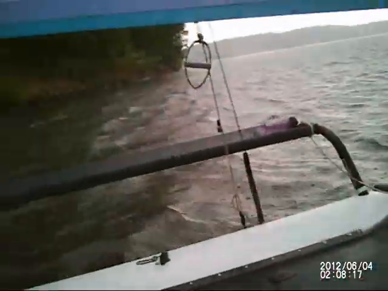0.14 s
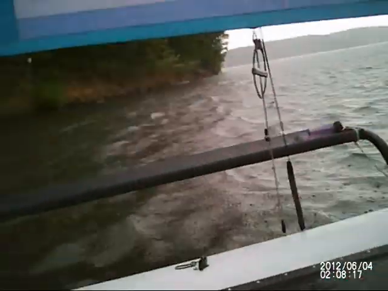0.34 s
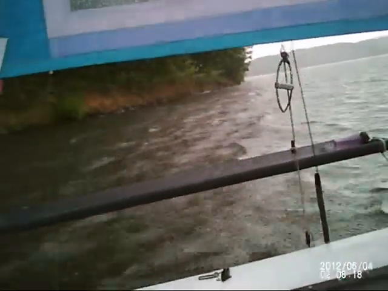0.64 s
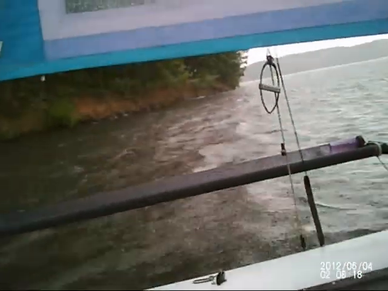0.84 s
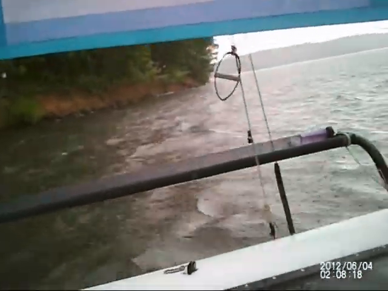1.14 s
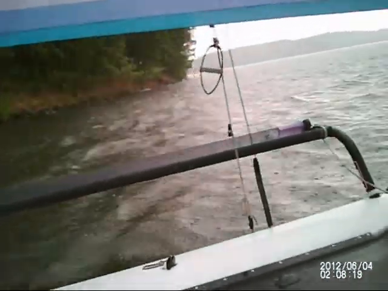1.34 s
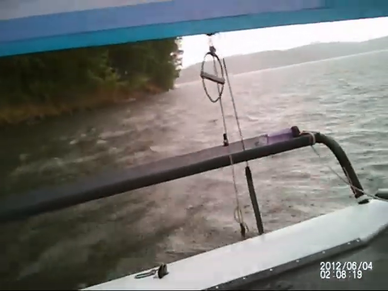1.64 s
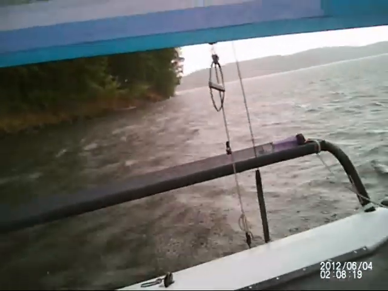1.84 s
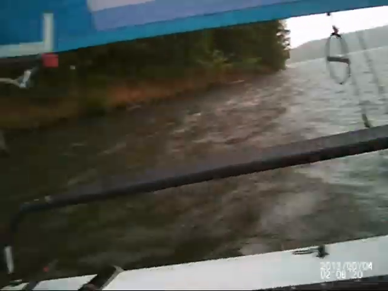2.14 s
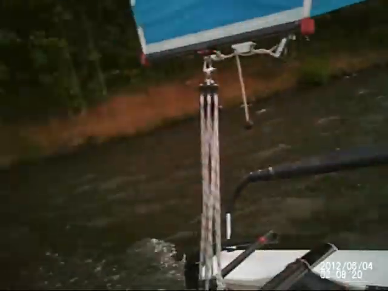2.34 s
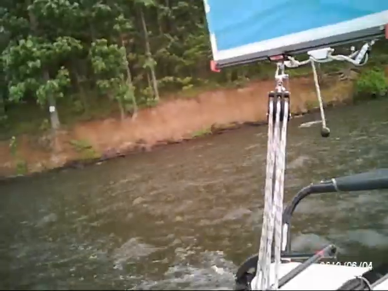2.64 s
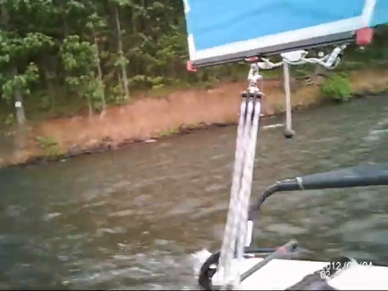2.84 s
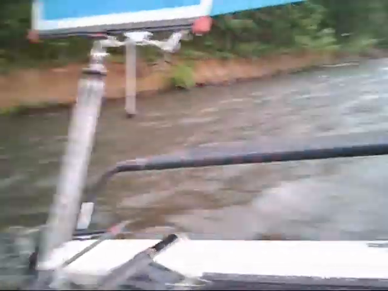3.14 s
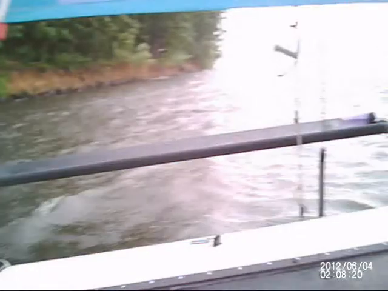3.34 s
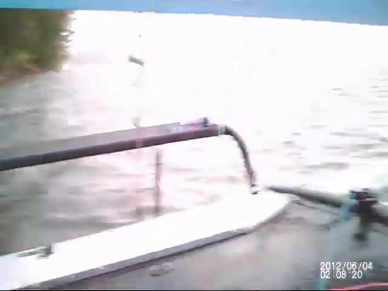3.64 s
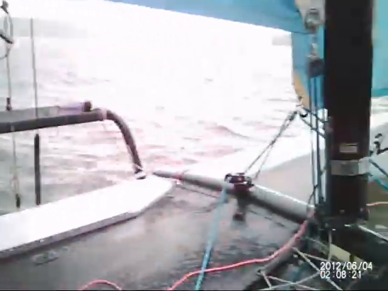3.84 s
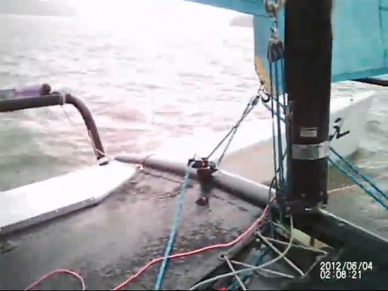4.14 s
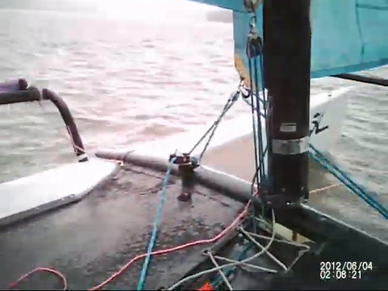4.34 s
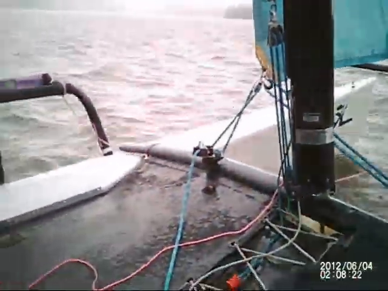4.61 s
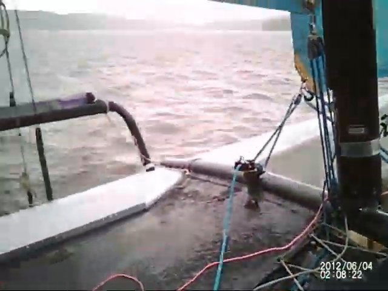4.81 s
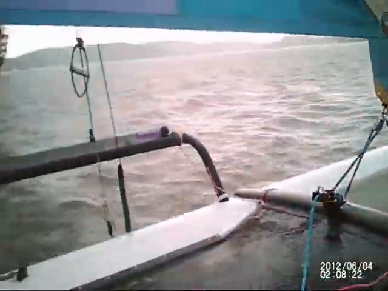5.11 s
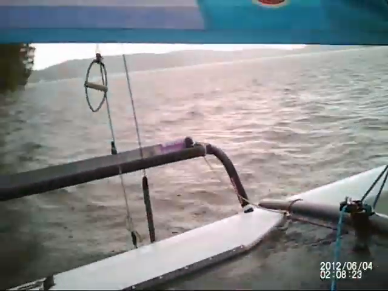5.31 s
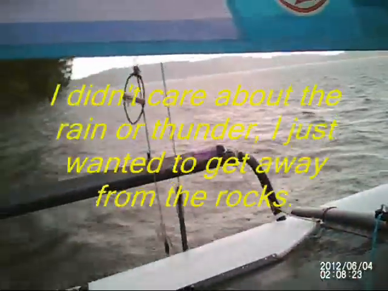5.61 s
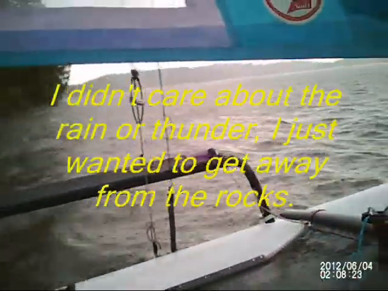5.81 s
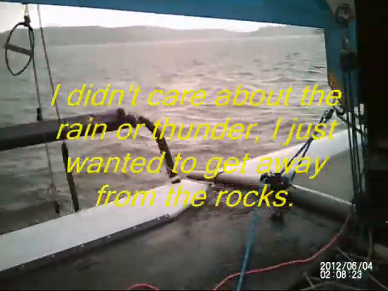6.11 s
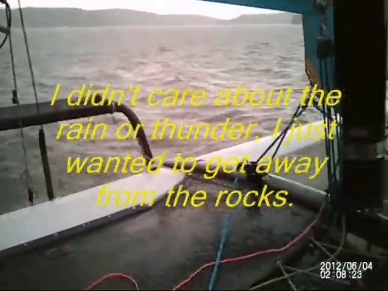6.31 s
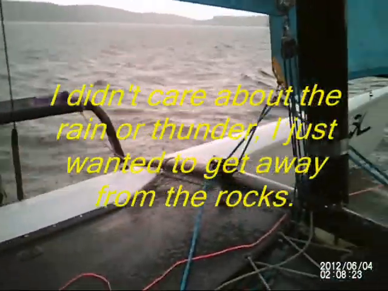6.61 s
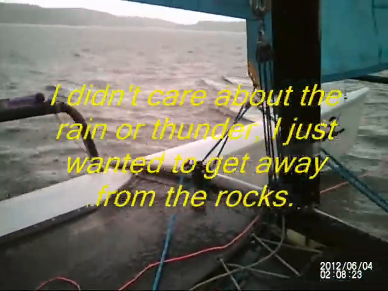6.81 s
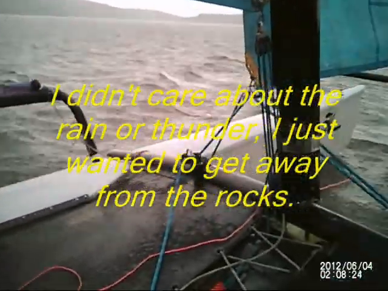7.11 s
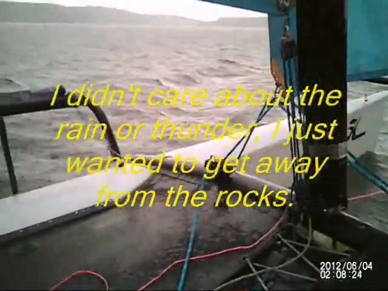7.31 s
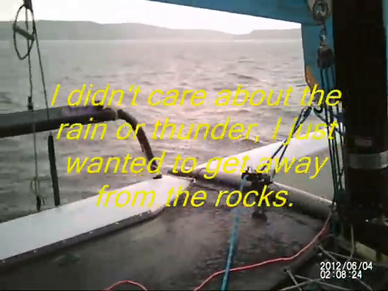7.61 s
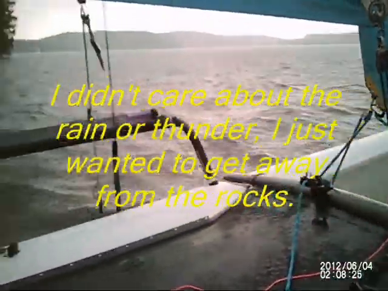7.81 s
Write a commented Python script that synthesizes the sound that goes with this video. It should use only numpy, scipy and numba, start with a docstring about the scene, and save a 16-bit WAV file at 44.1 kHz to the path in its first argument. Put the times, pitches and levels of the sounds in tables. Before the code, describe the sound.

Steady rain hisses over choppy lake water and a small boat, with sharp drop ticks, wave slaps and thumping low wind gusts, gritty and close.

```python
"""On the deck of a small sailing boat on a choppy lake, a cheap camera hears steady rain.
Filtered noise and many small impulses make the rain; near drops tick on the camera's case as short rings.
Waves are swells of noise with ringing bubbles and spray; gusts are low noise with thumping eddies.
The camera turns down loud moments, clips, and holds each sample at a low rate.
Those steps mirror the sound into a gritty treble."""
import sys
import numpy as np
from scipy import signal
from scipy.fft import rfft, irfft
from scipy.io import wavfile
from scipy.ndimage import uniform_filter1d
from numba import njit

SR = 44100
rng = np.random.default_rng(int(sys.argv[2]) if len(sys.argv) > 2 else 0)


def unload_audio(sound):
    """Save the sound as a 16-bit wav file, at the path given as the first command line argument."""
    columns = np.transpose(np.atleast_2d(sound))
    # keep every value between -1 and 1, then stretch to whole-number steps
    steps = np.round(np.clip(columns, -1, 1) * 32767)
    wavfile.write(sys.argv[1], SR, steps.astype(np.int16))


N = 351036
TIME = np.arange(N) / SR  # seconds

# Rain that eases slowly: time_s, level_db
RAIN_LEVEL = [(0, -22), (.55, -22.5), (1.6, -22), (2.1, -22.5), (2.8, -22.5), (4.0, -25), (4.7, -24.5),
              (5.95, -27), (7.96, -25.5)]
# Steady wash of water along the hulls: time_s, level_db
CHOP_LEVEL = [(0, -25.5), (1.7, -33.5), (3.6, -25.5), (4.3, -29.5), (5.6, -29.5), (6.2, -32.5), (7.96, -33)]
# Waves that slap the hulls: peak_s, churn_level_db, spray_level_db, half_width_s
WAVES = [(.12, -32, -25, .05), (.76, -18, -21, 0.045), (1.01, -15, -18, 0.03), (1.24, -20.5, -19, 0.082),
         (1.72, -21.5, -22.5, 0.058), (2.23, -20.5, -26, 0.097), (2.49, -17, -19, 0.049),
         (3.015, -14, -26, 0.039), (3.13, -25, -18, 0.019), (3.3, -18.5, -22.5, 0.042),
         (3.95, -30.5, -25.5, 0.097), (5.18, -37, -25.5, 0.052), (5.41, -25, -24.5, 0.09),
         (6.2, -36, -24, 0.051), (6.43, -34, -26, .05), (6.62, -23.5, -22, 0.074), (7.33, -25, -31, 0.15),
         (7.65, -39, -23, 0.057)]
# Gusts on the microphone, each with an eddy at its height: peak_s, level_db, half_width_s, eddy_pitch_hz
GUSTS = [(.19, -25, 0.089, 171), (.34, -27, .04, 200), (.705, -20.5, 0.12, 198), (0.929, -24, 0.048, 200),
         (1.143, -21, .03, 264), (1.225, -12, 0.05, 340), (1.444, -12.5, 0.04, 306),
         (1.607, -17, 0.12, 262), (1.715, -17, 0.066, 253), (1.785, -15, 0.03, 230),
         (1.969, -11.5, 0.031, 302), (2.055, -3.5, 0.023, 245), (2.241, -15.5, 0.041, 294),
         (3.01, -32, 0.018, 343), (3.198, -23.5, 0.036, 160), (3.55, -16.5, 0.0097, 245),
         (3.631, -16.5, 0.052, 213), (3.743, -17, 0.02, 304), (3.919, -19, 0.039, 164),
         (3.964, -18, 0.083, 268), (4.165, -20.5, 0.014, 219), (4.488, -18, 0.043, 295),
         (4.696, -16, 0.069, 188), (4.883, -22, 0.11, 316), (5.631, -15.5, 0.072, 235),
         (5.748, -19, 0.01, 286), (6.171, -19, 0.045, 245), (6.535, -19, 0.069, 276),
         (7.081, -17.5, 0.038, 166), (7.38, -34, .07, 200), (7.544, -17, 0.083, 216)]
# Tone colours, relative levels only: frequency_hz, gain_db
RAIN_COLOUR = [(60, -46), (150, -6), (400, -9), (800, -4.5), (1200, 0), (1550, 3), (2000, -1.5),
               (2400, -10), (2900, -16), (3400, -12.5), (3750, -21.5), (4000, -33)]
CHOP_COLOUR = [(50, -49), (130, -14), (350, 1), (600, 1), (950, -0.5), (1400, -4), (2500, -38.5)]
WIND_COLOUR = [(20, -51), (45, -53), (75, -14.5), (115, -1), (160, 1), (270, -2), (400, -8), (700, -21),
               (2000, -37.5)]
# Drops that strike the case: peak_s, tick_level_db, tick_pitch_hz, thud_level_db (before THUD_LIFT_DB)
CASE_DROPS = [(0.2796, -7, 1490, -23), (.359, 0, 1390, -20), (1.0556, -1.5, 1600, -14),
              (1.0826, -6, 1610, -23), (1.2006, -1, 1420, -23), (1.259, 0, 1710, -9),
              (1.301, -3.5, 1850, -20), (1.3324, 2, 1400, -33), (1.4576, -2.5, 1590, -13),
              (1.898, 1, 1870, -13), (2.432, -4, 1700, -21), (2.4605, -5, 1940, -32), (2.55, -2, 1890, -32),
              (2.654, -3, 1560, -13.5), (2.7204, 1, 1650, -15.5), (2.7774, -5.5, 1340, -24),
              (2.8559, -3, 1680, -16), (2.8617, 0, 1410, -18), (2.9728, -2.5, 1780, -27),
              (3.1007, 3, 1720, -25), (3.1724, 2, 1480, -16), (3.2105, 3, 1620, -11),
              (3.6432, 0, 2000, -30), (4.661, 1.5, 1410, -30), (4.8819, 5.5, 1450, -11),
              (5.0763, -4.5, 1650, -21), (5.2209, -6.5, 1620, -36), (5.3211, -6.5, 1590, -19),
              (5.447, -5, 1810, -26), (5.664, -4.5, 1360, -19), (5.917, -5, 1590, -15.5),
              (6.3482, -8.5, 1700, -36), (6.7348, -5.5, 1400, -40), (6.8211, -4, 1560, -21),
              (7.306, -13, 1330, -27), (7.4304, -4.5, 1570, -21), (7.618, -7, 1570, -35),
              (7.65, -6, 1580, -27)]
# Moments when the level dips briefly: middle_s, depth_db, width_s (standard deviation of the bell shape)
DIPS = [(1.503, -8.5, 0.0075), (2.806, -7, 0.022), (3.579, -11, 0.0055), (3.68, -5, 0.0087),
        (6.94, -1, 0.028), (7.57, -6, 0.017)]
# Air pockets closing in the waves: start_s, peak_level_db, starting_pitch_hz, rise_s
PLOPS = [(2.861, -10, 614, 0.0031), (2.935, -17, 338, 0.0054), (3.003, -14, 303, 0.0085),
         (3.125, -16, 564, 0.0076), (3.36, -14, 1015, 0.0032), (4.334, -14.5, 1017, 0.0068),
         (5.467, -9.5, 780, 0.0026), (5.48, -10.5, 1020, 0.0025)]

WAVE_FALL, GUST_FALL = 1.45, 0.97  # fall time as a multiple of rise time
BREEZE_DB = -29  # wind between the gusts
EDDY_DB = 12  # an eddy's peak above its gust's level, before the leak filter
CRACK_DB, THUD_LIFT_DB = -10.5, 4.0  # crack relative to its tick; lift added to every thud
DUCK_ABOVE_DB, DUCK_RATIO = -8.5, 1.74  # the camera's gain control
DUCK_ATTACK_S, DUCK_RELEASE_S = 0.0019, 0.04
CAMERA_HZ = 8000  # the camera's sample rate
TOP_HZ = 15550  # upper limit of the finished sound


def undb(db):
    """Turn decibels into a gain."""
    return 10 ** (np.asarray(db) / 20)


def curve(rows):
    """Join rows of (time_s, value) by straight lines."""
    return np.interp(TIME, *np.transpose(rows))


def swells(rows, steady_db, fall):
    """Level in dB of a steady bed plus swells that grow and die away exponentially."""
    power = undb(steady_db) ** 2
    for peak_s, level_db, half_width_s in rows:
        # a swell halves its amplitude for each half width away from its peak; the fall is scaled
        away = np.maximum(peak_s - TIME, (TIME - peak_s) / fall) / half_width_s
        power = power + (undb(level_db) * np.exp2(-away)) ** 2
    return 10 * np.log10(power)


def colour(x, points):
    """Shape the tone through (frequency_hz, gain_db) points, without looking ahead; rms 1."""
    hz, db = np.transpose(points)
    size = 4096
    grid_hz = np.fft.rfftfreq(size, 1 / SR)
    gain_db = np.interp(np.log(grid_hz + 1), np.log(hz), db)
    # folding the cepstrum gives a filter that responds as early as it can
    cepstrum = irfft(np.log(undb(gain_db)))[:size // 2]
    cepstrum[1:] *= 2
    response = irfft(np.exp(rfft(cepstrum, size)))
    y = signal.fftconvolve(x, response)[:N]
    return y / np.std(y)


def walk(rate):
    """Random levels held for 1 / rate seconds, then smoothed twice; spread 1."""
    hold = int(SR / rate)
    held = rng.standard_normal(N)[np.arange(N) // hold]
    smooth = uniform_filter1d(uniform_filter1d(held, hold), hold)
    return smooth / np.std(smooth)


def ring(hz, rise_s, glide=0):
    """A damped swing whose outline peaks at 1 after rise_s; its pitch climbs by glide per rise time."""
    age = np.arange(int(10 * rise_s * SR)) / (rise_s * SR)  # in rise times
    cycles = hz * rise_s * age * (1 + glide * age / 2)
    return age * np.exp(1 - age) * np.sin(2 * np.pi * cycles)


def add(out, at_s, sound):
    """Mix a sound in from a given time."""
    i = max(int(at_s * SR), 0)
    out[i:i + len(sound)] += sound[:max(N - i, 0)]


def impacts(per_s, spread_db, largest_db):
    """Impulses at random moments, many small and few large; rms 1."""
    hit = rng.random(N) < per_s / SR
    # tanh keeps the sizes below largest_db
    size_db = largest_db * np.tanh(spread_db * rng.exponential(size=N) / largest_db)
    x = hit * undb(size_db) * np.sign(rng.standard_normal(N))
    return x / np.std(x)


@njit
def follow(size, attack, release):
    """Level follower that rises quickly and sinks slowly."""
    out, level = np.empty(len(size)), 0.
    for i in range(len(size)):
        level += (size[i] - level) * (attack if size[i] > level else release)
        out[i] = level
    return out


def rain():
    """Far drops on the lake merge into a hiss; nearer ones patter on deck and sail in flurries."""
    hiss = undb(-2.0) * rng.standard_normal(N)
    patter = undb(-7.5) * impacts(per_s=520, spread_db=3.5, largest_db=19)
    flurry_db = 1.2 * walk(rate=48)
    # a few land within arm's reach and stand out as single ticks
    near = undb(-8.5) * impacts(per_s=26, spread_db=13, largest_db=14.5)
    wash = colour(hiss + patter + near, RAIN_COLOUR) * undb(flurry_db)
    # drops on puddles and taut cloth ring for a cycle or two, some low, some high
    pats = np.zeros(N)
    for hz in np.geomspace(1000, 2100, 6):
        hits = impacts(per_s=24, spread_db=12.5, largest_db=16.5)
        pats += signal.fftconvolve(hits, ring(hz, rise_s=1.23 / hz))[:N]
    # spray thrown up by the waves falls with the rain
    spray = [(s, spray_db, width) for s, _, spray_db, width in WAVES]
    level_db = swells(spray, curve(RAIN_LEVEL), WAVE_FALL)
    return (wash + undb(-6) * pats / np.std(pats)) * undb(level_db)


def chop():
    """Churning water swells with each wave; small bubbles rise in pitch as they reach the surface."""
    churn = colour(rng.standard_normal(N), CHOP_COLOUR) * undb(3.3 * walk(rate=35) - 2.5)
    bubbles = np.zeros(N)
    for when, size, depth in rng.random((800, 3)):
        hz = 380 * 3.26 ** size
        bubble = undb(-16 * depth) * ring(hz, rise_s=1.94 / hz, glide=0.026)
        add(bubbles, when * N / SR, bubble)
    slaps = [(s, churn_db, width) for s, churn_db, _, width in WAVES]
    level_db = swells(slaps, curve(CHOP_LEVEL), WAVE_FALL)
    return (churn + undb(4) * bubbles) * undb(level_db)


def wind():
    """Turbulence rumbles on the microphone, brighter when it blows hard; eddies thump at each gust's height."""
    gust_db = swells([row[:3] for row in GUSTS], BREEZE_DB, GUST_FALL) + 1.14 * walk(rate=40)
    rumble = colour(rng.standard_normal(N), WIND_COLOUR) * undb(gust_db - 2.5)
    flutter_colour = [(120, -24.5), (420, 1.5), (650, -6), (1200, -8.5), (2500, -28.5)]  # Hz, dB
    # the flutter's level changes more than the rumble's as the wind rises and falls
    flutter = colour(rng.standard_normal(N), flutter_colour) * undb(1.26 * gust_db - 5.5)
    thumps = np.zeros(N)
    for peak_s, level_db, _, hz in GUSTS:
        rise_s = 0.5 / hz
        add(thumps, peak_s - rise_s, undb(level_db + EDDY_DB) * ring(hz, rise_s, glide=-0.031))
    # smaller eddies tumble by at random, as strong as the wind of the moment
    tumble = np.zeros(N)
    for hz in (170, 240, 340):
        hits = impacts(per_s=14, spread_db=1, largest_db=8)
        tumble += signal.fftconvolve(hits, ring(hz, rise_s=0.5 / hz))[:N]
    thumps += tumble / np.std(tumble) * undb(gust_db - 7.5)
    # the slowest pressure changes leak round the diaphragm
    leak_hz = 80
    leak = signal.butter(2, leak_hz, "high", fs=SR, output="sos")
    return rumble + flutter + signal.sosfilt(leak, thumps)


def case_drops():
    """A drop on the case: a crack, a short tick, a duller thud of the shell, and a little scattered spray."""
    out = np.zeros(N)
    tick_s, spray_s, crack_s = 0.00034, 0.004, 0.0002  # rise, fade and rise times
    age = np.arange(SR // 40) / SR
    noises = rng.standard_normal((len(CASE_DROPS), len(age)))
    for (peak_s, tick_db, hz, thud_db), noise in zip(CASE_DROPS, noises):
        add(out, peak_s - crack_s, undb(tick_db + CRACK_DB) * ring(3340, crack_s))
        add(out, peak_s - tick_s, undb(tick_db) * ring(hz, tick_s))
        thud_hz = 500 * np.exp(0.3 * noise[0])  # differs from drop to drop
        add(out, peak_s, undb(thud_db + THUD_LIFT_DB) * ring(thud_hz, rise_s=0.0017))
        spray = signal.fftconvolve(noise * np.exp(-age / spray_s), ring(0.98 * hz, tick_s))
        add(out, peak_s, undb(tick_db - 9.0) * spray / np.max(np.abs(spray)))
    return out


def brief_dips():
    """Gain that sags for an instant now and then, each dip a smooth bell shape in dB."""
    dip_db = np.zeros(N)
    for middle_s, depth_db, width_s in DIPS:
        dip_db += depth_db * np.exp(-((TIME - middle_s) / width_s) ** 2 / 2)
    return undb(dip_db)


def plops():
    """Large air pockets ring, rising slightly in pitch, as waves fold against the hulls."""
    out = np.zeros(N)
    for start_s, level_db, hz, rise_s in PLOPS:
        add(out, start_s, undb(level_db) * ring(hz, rise_s, glide=0.013))
    return out


def scene():
    """Weather and water together; the dips touch rain, chop and wind but not the plops or case drops."""
    background = rain() + chop() + wind()
    mix = background * brief_dips() + case_drops() + plops()
    return mix[None]  # one channel


def duck(x):
    """Gain control: a loud sound turns everything down for an instant."""
    level = follow(np.abs(x), 1 / (DUCK_ATTACK_S * SR), 1 / (DUCK_RELEASE_S * SR))
    excess = np.maximum(level / undb(DUCK_ABOVE_DB), 1)
    return x * excess ** (1 / DUCK_RATIO - 1)


def record(dry):
    """The camera ducks, samples slowly, clips and holds steps, which mirror the sound above 4 kHz."""
    slow = signal.resample_poly(duck(dry[0]), CAMERA_HZ, SR)
    clipped = np.clip(slow, -0.93, 0.93)
    soften = signal.butter(4, 3800, fs=CAMERA_HZ, output="sos")  # low-pass, Hz
    softened = signal.sosfilt(soften, clipped)
    steps = softened[None, (TIME * CAMERA_HZ).astype(int)]  # each sample held until the next
    top = signal.ellip(10, 0.05, 50, TOP_HZ, fs=SR, output="sos")
    return signal.sosfiltfilt(top, steps)


dry = scene()
out = record(dry)
unload_audio(out)
```